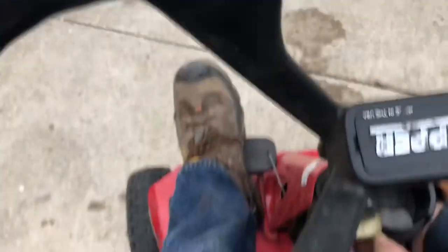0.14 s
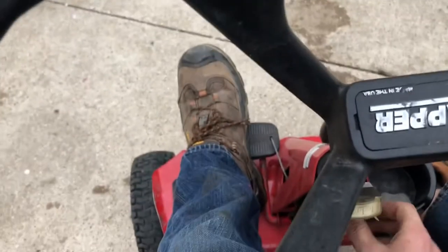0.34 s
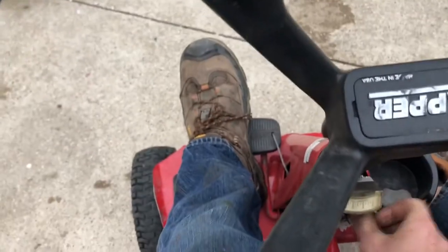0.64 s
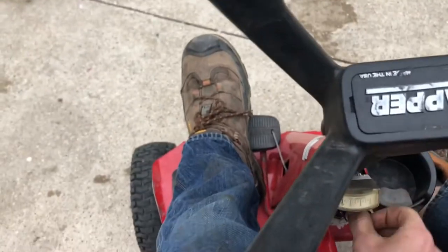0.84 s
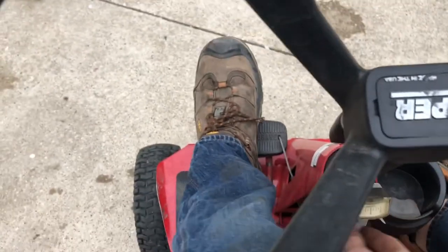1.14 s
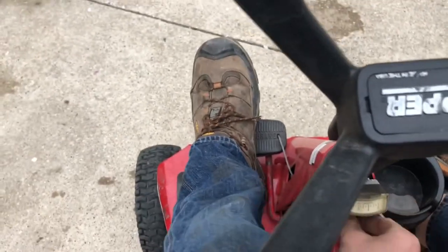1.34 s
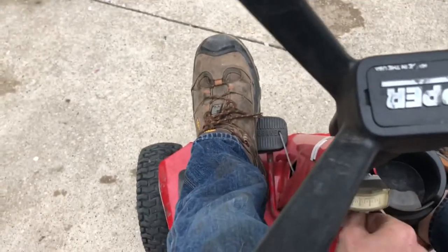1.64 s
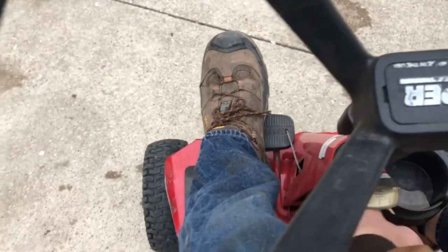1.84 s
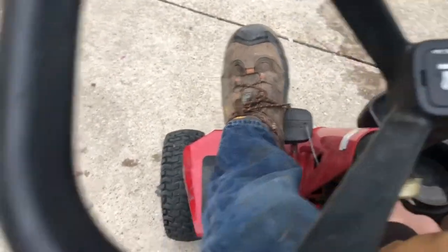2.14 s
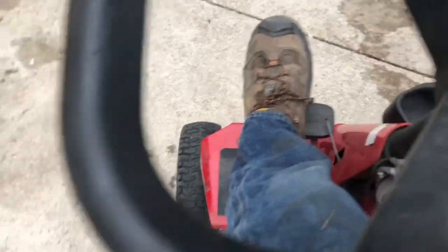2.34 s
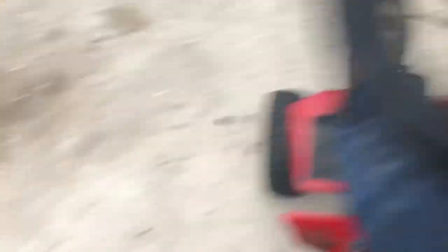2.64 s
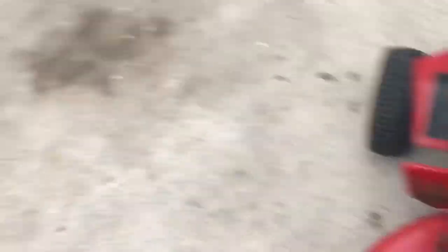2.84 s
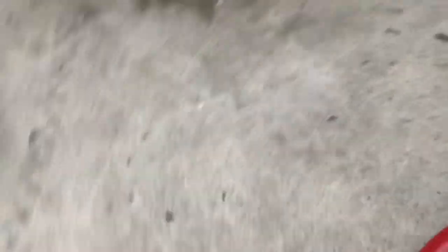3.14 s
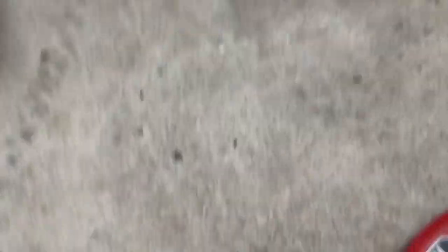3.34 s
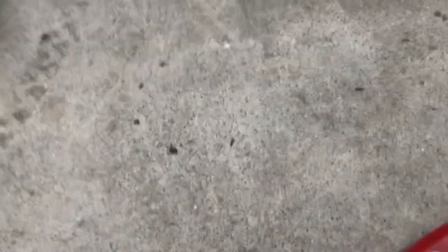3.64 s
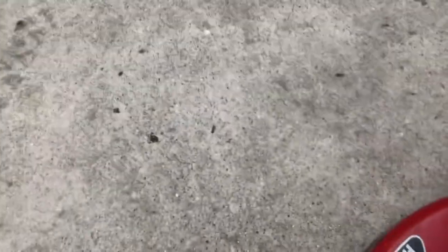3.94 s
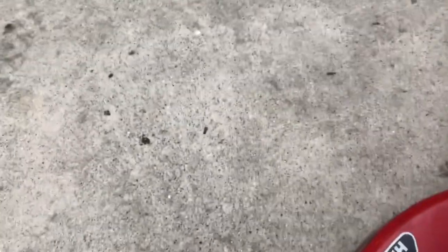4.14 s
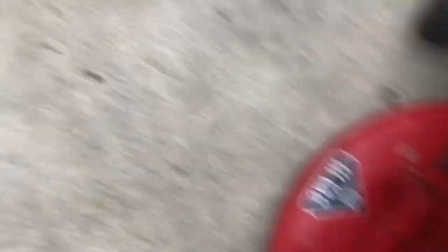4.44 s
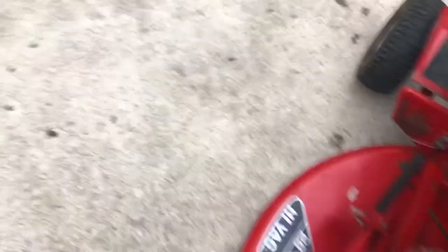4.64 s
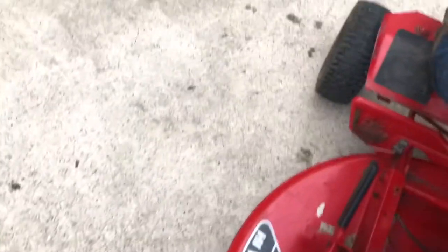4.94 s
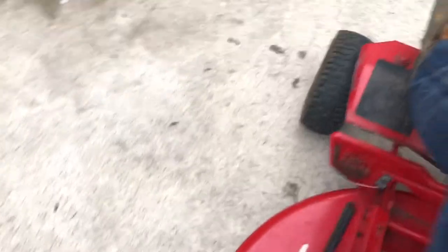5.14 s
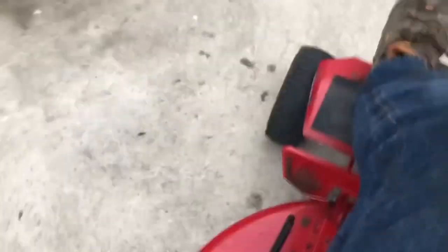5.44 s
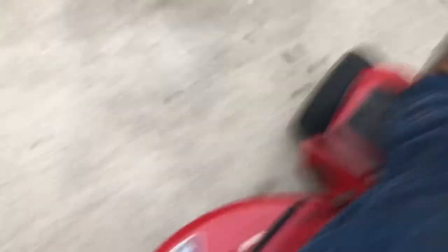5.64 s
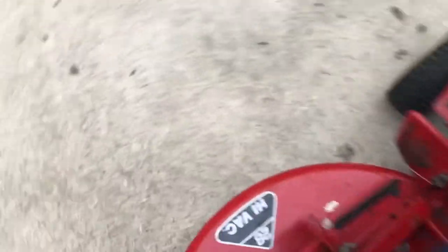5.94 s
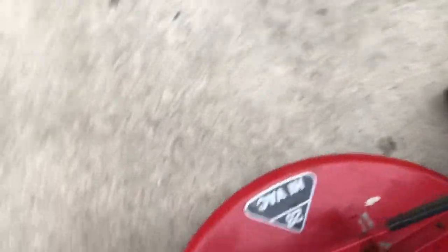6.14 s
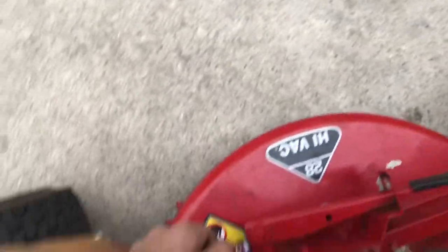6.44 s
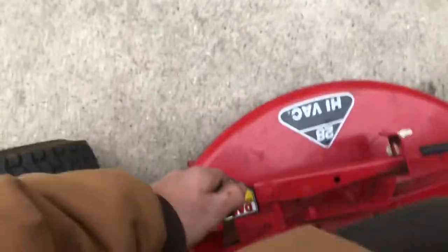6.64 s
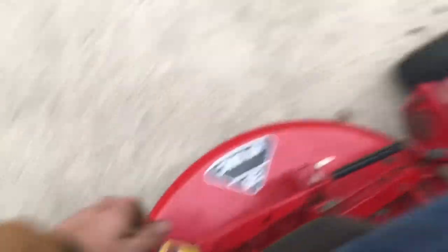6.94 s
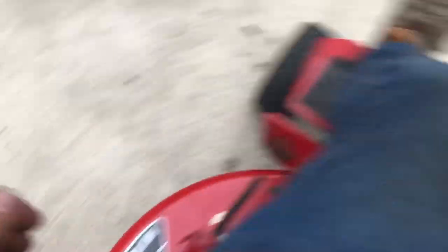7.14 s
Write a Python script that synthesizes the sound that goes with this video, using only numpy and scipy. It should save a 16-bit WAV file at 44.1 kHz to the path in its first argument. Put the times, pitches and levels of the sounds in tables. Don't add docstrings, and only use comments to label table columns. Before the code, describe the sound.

Key rattles and sharp clicks, then a small riding mower's starter grinds, the engine chugs unevenly, catches, revs up and settles into steady clattering running.

```python
import sys
import numpy as np
from scipy import signal
from scipy.fft import rfft, irfft
from scipy.io import wavfile
from scipy.ndimage import uniform_filter1d

SR = 44100
rng = np.random.default_rng(int(sys.argv[2]) if len(sys.argv) > 2 else 0)


def linear_from_db(decibels):
    return 10 ** (np.asarray(decibels, float) / 20)


def digitize_waveform(pressure):
    field = np.atleast_2d(pressure).T
    bounded = np.clip(field, -1, 1)
    quanta = np.round(bounded * 32767).astype(np.int16)
    wavfile.write(sys.argv[1], SR, quanta)


N = 322371
T = np.arange(N) / SR

# frequency in Hz, level in dB.
RUN_COLOUR = [(18, -34), (30, -24), (90, -7), (134, -11), (184, -0.5), (245, -2), (473, -4), (540, -15),
              (866, -17), (937, -20), (1760, -23.5), (2010, -25), (6210, -38), (16000, -48.5)]


def evened(x):
    return x / np.sqrt(np.mean(x ** 2) + 1e-20)


def curve(rows):
    s, *columns = np.transpose(rows)
    return [np.interp(T, s, c) for c in columns]


def add(mix, s, sound):
    part = mix[round(s * SR):][:len(sound)]
    part += sound[:len(part)]


def wander(per_s, count=1):
    points = rng.standard_normal((count, int(N / SR * per_s) + 3))
    return np.array([np.interp(T * per_s, np.arange(len(p)), p) for p in points]) * 2.57


def noise(colour, modes=(), lift_db=0., patchy_db=-1.5):
    a, b, patches = rng.standard_normal((N // 128 + 5, 257, 3)).T
    patches = uniform_filter1d(uniform_filter1d(patches, size=5, axis=0), size=24, axis=1)
    spectrum = (a + 1j * b) * linear_from_db(patchy_db * evened(patches))
    white = signal.istft(spectrum, nperseg=512, noverlap=384)[1][:N]
    hz = np.fft.rfftfreq(N, 1 / SR)
    f, db = np.transpose(colour)
    gain = linear_from_db(np.interp(np.log(hz + 1), np.log(f), db))
    gain *= 1 + sum(linear_from_db(lift_db) / (1 + (2 * (hz - m) / w) ** 2) for m, w, _ in modes)
    coloured = rfft(white) * gain
    low, high = 1 / (1 + (hz / 550) ** 4), 1 / (1 + (3000 / (hz + 1)) ** 4)
    return [evened(irfft(coloured * band, N)) for band in (low, 1 - low - high, high)]


def ring(hz, t60, rise_s):
    t = np.arange(int(t60 * SR)) / SR
    x = (1 - np.exp(-(t / rise_s) ** 2)) * linear_from_db(-60 * t / t60) * np.sin(2 * np.pi * hz * t)
    return x / abs(x).max()


def strike(turns, share, db, spread_db, sound):
    at = np.flatnonzero(np.diff(np.floor(turns + 1 - share)))
    train = np.zeros(N)
    train[at] = linear_from_db(db + spread_db * rng.standard_normal(120)[:len(at)])
    return signal.oaconvolve(train, sound)[:N]


def window(turns, centre, width):
    return np.exp(-(((turns - centre + .5) % 1 - .5) / width) ** 2)


def yard():
    # frequency in Hz, level in dB.
    yard_colour = [(15, -48), (25, -4), (123, 1.5), (141, -4), (256, -6), (531, -22), (988, -28),
                   (1070, -27), (1370, -29.5), (3250, -32.5), (16000, -49)]
    # time in s, level in dB.
    rustle = [
        (0.0, -65),
        (0.62, -68.5),
        (0.838, -66),
        (1.046, -52.5),
        (1.136, -61),
        (1.534, -68.5),
        (1.61, -51),
        (1.7, -57),
    ]
    low, mid, high = noise(yard_colour, patchy_db=0.8)
    breeze = linear_from_db(-3 * np.clip(4 * (T - 1.14), 0, 1))
    air = linear_from_db(-60) * (breeze * low + 0.082 * high)
    return air + linear_from_db(curve(rustle)[0]) * (mid + 0.5 * high) * (T < 1.8)


def clicks():
    # start in s, peak in dB, ring in Hz, t60 in s.
    click_events = [(0.171, -38, 4000, 0.049), (0.183, -30, 4050, 0.043), (0.194, -35, 3950, 0.062),
                    (0.205, -29, 3440, 0.18), (0.207, -51, 3250, 0.091), (0.257, -37, 2790, 0.094),
                    (0.285, -46, 3120, 0.045), (0.299, -46, 4650, 0.045), (0.454, -44, 3250, 0.049),
                    (0.464, -45, 3320, 0.049), (0.476, -28, 3900, 0.059), (0.57, -49, 8000, 0.015),
                    (0.585, -28, 2930, 0.034), (0.59, -32, 2810, 0.031), (0.603, -30.5, 3180, 0.028),
                    (0.946, -47, 1460, 0.045), (1.002, -5, 3890, 0.048), (1.015, -19, 8500, 0.045),
                    (1.559, -10, 2540, 0.055), (1.566, -17, 1220, 0.05), (1.697, -7.5, 1250, 0.019)]
    # frequency in Hz, level in dB.
    click_colour = [(88, -43), (150, -26), (1830, -5.5), (2600, -3.5), (2920, -1.5), (4000, -3), (4410, -2),
                    (7040, 0), (16000, -13)]
    # frequency in Hz, level in dB.
    key_modes = [(2750, -20), (4000, -16), (5200, -15), (7000, -29)]
    # start in s, level in dB.
    snaps = [
        (.585, -38),
        (1.002, -29),
        (1.56, -20),
    ]
    low, mid, high = noise(click_colour)
    crack, out = 0.15 * low + .5 * mid + 0.66 * high, np.zeros(N)
    for (s, db, hz, t60), mood in zip(click_events, rng.standard_normal((len(click_events), 4))):
        t = np.arange(int(3 * t60 * SR)) / SR
        fall = linear_from_db(-110 * t / t60) + 0.26 * linear_from_db(-25 * t / t60)
        shape = (1 - np.exp(-t / 0.00059)) * fall
        add(out, s, linear_from_db(db - 14.0) * shape * crack[round(s * SR):][:len(t)])
        add(out, s, linear_from_db(db - 9.5) * ring(hz, t60 * 0.16, 0.0019))
        if s < .7:
            for (key_hz, key_db), m in zip(key_modes, mood):
                add(out, s, linear_from_db(db + key_db + 2.3 * m) * ring(key_hz * (1 + 0.041 * m), 0.027, 0.00055))
    t, fizz = np.arange(2000) / SR, evened(np.diff(high, n=2))
    for s, db in snaps:
        shape = linear_from_db(db - 60 * t / .025) * (1 - np.exp(-t / 0.0012))
        add(out, s, shape * fizz[round(s * SR):][:len(t)])
    return out


def whines():
    # start in s, end in s, first pitch in Hz, last pitch in Hz, level in dB.
    gear_tones = [(1.71, 1.81, 330, 325, -25), (1.71, 1.8, 460, 458, -30), (1.71, 1.76, 1010, 1010, -30),
                  (1.71, 1.77, 1460, 1460, -35), (1.71, 1.76, 1750, 1750, -37), (1.73, 1.82, 200, 190, -31),
                  (2.05, 2.2, 360, 300, -40), (2.21, 2.33, 1760, 1830, -42), (1.76, 1.97, 465, 460, -38),
                  (1.97, 2.05, 720, 700, -40), (1.8, 1.96, 1790, 1740, -48), (1.8, 1.96, 200, 185, -42),
                  (1.8, 1.95, 330, 290, -45), (1.77, 1.83, 1010, 1000, -41), (1.83, 1.98, 920, 880, -44),
                  (1.96, 2.07, 320, 360, -35), (1.94, 2.0, 1490, 1520, -47), (1.99, 2.03, 1500, 1500, -39),
                  (2.06, 2.11, 1500, 1510, -42), (1.99, 2.06, 860, 900, -43), (1.96, 2.03, 1030, 1060, -44),
                  (2.02, 2.06, 1280, 1270, -42), (1.98, 2.06, 1790, 1740, -43),
                  (2.06, 2.13, 1730, 1720, -44), (2.04, 2.11, 470, 450, -35), (2.11, 2.2, 450, 440, -42),
                  (2.06, 2.17, 990, 1040, -39), (2.18, 2.26, 1040, 1000, -39),
                  (2.14, 2.22, 1180, 1230, -43), (2.22, 2.33, 1450, 1560, -44), (2.19, 2.23, 310, 310, -38)]
    # start in s, end in s, first pitch in Hz, last pitch in Hz, level in dB.
    brush_bands = [
        (1.912, 2.272, 5420, 5070, -41.5),
        (2.053, 2.26, 9500, 9650, -46),
    ]
    # start in s, end in s, pitch in Hz, level in dB.
    buzzes = [(.93, 1.1, 150, -56), (1.56, 1.62, 200, -50), (.95, 1.003, 1660, -49),
              (.975, 1.003, 3500, -58), (1.02, 1.09, 1800, -56), (1.78, 2.3, 6400, -55),
              (2.08, 2.22, 8620, -55), (3.215, 3.245, 2900, -43), (6.0, 6.9, 4610, -39),
              (4.35, 5.15, 1770, -37), (5.9, 6.95, 1755, -35), (5.055, 5.09, 5750, -33),
              (5.112, 5.15, 5750, -32), (7.1, 7.31, 5780, -37), (7.24, 7.28, 10500, -41)]
    rows = [(*row, 18) for row in gear_tones]
    rows += [(*row, .1 * row[2]) for row in brush_bands]
    rows += [(s0, s1, hz, hz, db, 60) for s0, s1, hz, db in buzzes]
    out = np.zeros(N)
    for s0, s1, hz0, hz1, db, width in rows:
        n = int((s1 - s0) * SR)
        pole = np.exp(-np.pi * width / SR)
        slow = signal.lfilter([1], [1, -pole], rng.standard_normal((2, 2 * SR)))[:, -n:]
        slow = (slow[0] + 1j * slow[1]) / np.hypot(*slow) ** .5
        carrier = np.exp(2j * np.pi * np.cumsum(np.linspace(hz0, hz1, n)) / SR)
        add(out, s0, linear_from_db(db) * evened((carrier * slow).real) * signal.windows.tukey(n, .4))
    return out


def jingle():
    # frequency in Hz, level in dB.
    jingle_modes = [(4600, -5), (5730, -2), (6230, -4), (7130, -5), (7890, -8), (8780, -7), (10200, -11),
                    (11600, -12), (12500, -10)]
    # time in s, level in dB.
    jingle_hits = [(4.976, -36), (6.087, -39), (6.5, -26), (6.667, -29), (6.785, -26), (6.864, -33),
                   (6.97, -26.5), (7.047, -35), (7.213, -25.5), (7.251, -23), (7.285, -24.5)]
    per_s, level_db, spread_db, t60 = 60, -38, 3, .1
    at = np.flatnonzero((rng.random(N) < per_s / SR) & (T > 4.45))
    out, t = np.zeros(N), np.arange(6000) / SR
    force_db = spread_db * rng.standard_normal(len(at)) / 2
    for hz, db in jingle_modes:
        train = np.zeros(N)
        train[at] = linear_from_db(level_db + db + force_db + spread_db * rng.standard_normal(len(at)))
        for (s, hit_db), mood in zip(jingle_hits, rng.standard_normal(len(jingle_hits))):
            train[round(s * SR)] = linear_from_db(hit_db + db + spread_db * mood)
        out += signal.oaconvolve(train, linear_from_db(-60 * t / t60) * np.sin(2 * np.pi * hz * t))[:N]
    return out


def starter():
    # time in s, level in dB.
    spin = [
        (1.8, -49),
        (1.912, -48),
        (2.02, -48),
        (2.158, -44),
        (2.33, -36),
        (2.56, -41),
        (3.088, -46.5),
        (3.334, -46.5),
        (3.572, -40.5),
        (3.7, -30.5),
    ]
    # time in s, housing in dB, frame in dB, hiss in dB, fall in dB per s.
    crunches = [
        (1.726, -13.5, -26, -25.5, 214),
        (2.015, -28, -61, -51, 110),
        (2.266, -28.5, -50, -41, 332),
        (2.405, -22, -31, -33.5, 172),
    ]
    # frequency in Hz, level in dB.
    crank_colour = [(18, -48), (30, 13.5), (93, 9), (199, 9), (328, 0.5), (600, -10.5), (866, -16.5),
                    (1390, -25), (1760, -26.5), (2010, -40), (2170, -35.5), (6300, -50.5), (7600, -54),
                    (9500, -57.5), (16000, -68)]
    # frequency in Hz, width in Hz, a third value in dB that is
    crank_modes = [(300, 89, 0), (1010, 160, -12), (1435, 17, -16), (1870, 440, -15), (2090, 41, -19),
                   (2860, 25, -19)]
    release_s = 2.25
    hiss = linear_from_db(curve(spin)[0])
    body, frame = linear_from_db(12.5) * hiss, linear_from_db(np.where(T < release_s, 6.5, 9.5)) * hiss
    for s, body_db, frame_db, hiss_db, fall in crunches:
        rise = np.exp(-(np.minimum(T - s, 0) / 0.036) ** 2)
        crunch = rise * linear_from_db(-fall * np.maximum(T - s - 0.011, 0))
        body = body + linear_from_db(body_db) * crunch
        frame = frame + linear_from_db(frame_db) * crunch
        hiss = hiss + linear_from_db(hiss_db) * crunch
    low, mid, high = noise(crank_colour, crank_modes, lift_db=2.0, patchy_db=1.0)
    thin = signal.filtfilt(*signal.butter(4, 140, "high", fs=SR), low)
    low = np.where(T < release_s, thin, low)
    teeth = linear_from_db(0.59 * wander(150)[0])
    on = np.clip((T - 1.705) / 0.018, 0, 1) * np.clip((3.75 - T) / 0.046, 0, 1)
    return on * (frame * low + teeth * (linear_from_db(-9.5) * body * mid + hiss * high))


def escaping_gas():
    # frequency in Hz, width in Hz, a third value in dB
    head_lift = [(1800, 140, 0), (2880, 1700, 0)]
    # frequency in Hz, level in dB.
    gas_colour = [(1180, -28), (2000, 4), (2570, -7), (2980, -2), (6470, -9), (7700, -11), (16000, -17)]
    return noise(RUN_COLOUR, head_lift, lift_db=6.0)[1], noise(gas_colour)[2]


def solenoid(mid, high):
    s, db, out = 1.6945, -16.5, np.zeros(N)
    t = np.arange(int(.03 * SR)) / SR
    add(out, s, linear_from_db(db) * ring(640, .065, 0.0022))
    add(out, s, 0.17 * linear_from_db(db - 60 * t / 0.07) * (mid + high)[:len(t)])
    return out


def chugs(mid, high):
    # start in s, peak in dB, ring in Hz.
    pops = [(2.364, -10.5, 300), (2.478, -6.5, 278), (2.534, -19, 308), (2.591, -10, 280),
            (2.656, -22, 240), (2.724, -14.5, 277), (2.869, -16, 290), (3.036, -17.5, 310),
            (3.233, -20.5, 362), (3.413, -14, 347), (3.563, -12.5, 358)]
    # time in s, peak in dB.
    thumps = [(1.94, -34), (2.259, -15), (2.395, -17), (2.539, -18), (2.659, -20), (2.767, -22.5),
              (3.086, -25.5), (3.289, -13.5), (3.459, -12.5), (3.594, -13)]
    # start in s, peak in dB, relative treble in dB, t60 in s.
    puffs = [(2.372, -15.5, -6.5, 0.085), (2.4, -24, 9, 0.13), (2.429, -33, 4, 0.075),
             (2.465, -18, -14, 0.068), (2.65, -21.5, -11.5, 0.12), (2.719, -23.5, -18, 0.031),
             (2.79, -23, -7, 0.083), (2.854, -34, 0, 0.05), (2.936, -35, 2, 0.055), (2.959, -28, -8, 0.12),
             (3.02, -31.5, 0, 0.1), (3.081, -29, -21, 0.035), (3.112, -38, 5, 0.039),
             (3.139, -20, -12.5, 0.052), (3.209, -42.5, 11, 0.061), (3.283, -18.5, -1, 0.04),
             (3.309, -31, 4.5, 0.06), (3.333, -22, -11, 0.091), (3.396, -31, 3, 0.051),
             (3.454, -18, 1.5, 0.069), (3.496, -20.5, -4, 0.072), (3.548, -32.5, 6, 0.055),
             (3.565, -18.5, -10, 0.062), (3.594, -12, -3.5, 0.056), (3.623, -16, -6, 0.044),
             (3.7583, -11.5, -10, 0.079), (4.0595, -16, 0, .03)]
    # start in s, peak in dB, ring in Hz, t60 in s.
    ticks = [(2.959, -25.5, 1800, 0.026), (2.967, -31, 1750, .025), (3.031, -34, 2900, .025),
             (3.081, -23.5, 780, 0.012), (3.114, -42, 6900, .05), (3.14, -30, 1820, .025),
             (2.808, -28, 1800, .03), (3.288, -29, 4400, 0.026), (3.41, -30, 2800, .03),
             (2.379, -19, 1180, .02), (4.06, -18, 2380, .015)]
    out = np.zeros(N)
    for s, db, hz in pops:
        add(out, s, linear_from_db(db + 1.0) * ring(hz, 0.028, 0.0023))
        add(out, s - 0.022, linear_from_db(db - 12.5) * ring(hz, 0.017, 0.0035))
    t = np.arange(-650, 1500) / SR
    pulse = -np.cos(2 * np.pi * 103 * t) * np.exp(-(t / np.where(t < 0, .003, .008)) ** 2)
    for s, db in thumps:
        thump = linear_from_db(db + 1.5) * pulse
        add(out, s, thump)
        add(out, s + 0.0142, 0.43 * thump)
    for s, db, treble_db, t60 in puffs:
        t = np.arange(int(t60 * SR)) / SR
        fall = np.exp(-7 * (t / t60) ** 2) + 0.65 * np.exp(-t / 0.0014)
        puff = (mid + linear_from_db(treble_db) * high)[round(s * SR):][:len(t)]
        add(out, s, linear_from_db(db - 9) * (1 - np.exp(-t / 0.0011)) * fall * puff)
    for s, db, hz, t60 in ticks:
        add(out, s, linear_from_db(db) * ring(hz, t60, 0.00059))
    return out


def exhaust_strokes(turns, speed):
    # share of the cycle, level in dB, ring in Hz, t60 in s, lead in s.
    stroke_rows = [
        (.02, 12.5, 325, 0.028, 0),
        (0.225, 13.5, 360, 0.024, .002),
    ]
    # share of the cycle, level in dB, ring in Hz, t60 in s, lead in s.
    exhaust_pulse_rows = [
        (0.755, 12.5, 295, 0.018, .006),
        (.78, 6, 215, .035, .006),
    ]
    # share of the cycle, level in dB, ring in Hz, t60 in s, lead in s.
    boom_rows = [
        (.48, 9.5, 108, .055, -.0035),
        (.68, 6.5, 98, .045, -.0035),
    ]
    pulse_gain = np.clip((speed - 13) / (21 - 13), .35, 1)
    boom = -linear_from_db(-2.3 * np.maximum(speed - 19.7, 0))
    strokes = np.zeros(N)
    for rows, gain in ((stroke_rows, 1), (exhaust_pulse_rows, pulse_gain), (boom_rows, boom)):
        for share, db, hz, t60, lead in rows:
            strokes += gain * strike(turns + lead * speed, share, db, 1.0, ring(hz, t60, 0.4 / hz))
    return strokes / np.sqrt(uniform_filter1d(strokes ** 2, size=6000) + 1e-4)


def order_stack(turns, muffler, facing):
    # multiple of the firing rate, level in dB.
    orders = [(1, -7), (2, 1.5), (4, -3.5), (5, 6), (6, -6.5), (7, -2.5), (8, -2.5), (9, 6), (10, -35),
              (11, 2), (12, -1.5), (13, -0.5), (15, -1.5), (16, -18), (17, -6), (18, -8), (20, -12),
              (22, -9.5), (23, -8.5), (24, -19.5), (25, -10.5), (26, -4.5), (27, -8.5), (28, -11), (30, -8),
              (31, -10), (32, -2), (34, -10.5), (35, -11), (36, -13), (37, -11), (40, -13), (42, -18.5),
              (44, -17.5), (48, -15), (50, -20.5), (54, -20), (56, -17.5)]
    run, stack = turns > 0, np.zeros(N)
    sway, phase = wander(5, count=len(orders))[:, run], turns[run] - .74
    facing, muffler = facing[run], muffler[run]
    shroud_db = 7 * np.maximum(facing, 0) * muffler
    for i, (k, db) in enumerate(orders):
        lift_db = 11 * facing * np.exp(-((k - 14) / 1.11) ** 2)
        lift_db = lift_db + .3 * facing * np.exp(-((k - 29) / 4) ** 2)
        lift_db = lift_db + shroud_db * np.exp(-((k - 21) / 6) ** 2)
        late = .002 * k ** 2 / (1 + (k / 30) ** 2)
        level = linear_from_db(db + .016 * k * sway[i] + lift_db)
        stack[run] += level * np.cos(2 * np.pi * (k * phase - late) + .011 * k * sway[-i])
    return linear_from_db(1.4) * stack / stack[run].std()


def tappet_ticks(turns):
    # share of the cycle, level in dB.
    tappet_rows = [
        (.26, 0),
        (.76, 0),
    ]
    # frequency in Hz, level in dB, t60 in s.
    head_modes = [(610, -6, 0.025), (800, -6, 0.022), (1040, -7, .02), (1330, -3, 0.025), (1755, 6, 0.055)]
    t = np.arange(1500) / SR
    head = sum(linear_from_db(db - 60 * t / t60) * np.sin(2 * np.pi * hz * t) for hz, db, t60 in head_modes)
    return evened(sum(strike(turns, share, db, 1.0, head) for share, db in tappet_rows))


def valve_knocks(turns):
    # time in s, level in dB.
    hard_knocks = [
        (3.29, -35),
        (3.758, -16),
        (3.89, -22),
        (4.4146, -26),
        (4.789, -6.5),
    ]
    hz, t60 = 2880, .022
    knock = ring(hz, t60, 0.0008) + .3 * ring(.83 * hz, t60, 0.001) + .4 * ring(1.06 * hz, t60, 0.001)
    knocks = strike(turns, .2, -17, 2.2, knock) * np.exp(-((T - 4.6) / 0.44) ** 2)
    for s, db in hard_knocks:
        add(knocks, s, linear_from_db(db) * knock)
    return knocks


def block(turns):
    k = np.arange(38, 70)
    lines = np.zeros(2049, complex)
    lines[k] = (1.3 - .6 * (k % 2)) / np.sqrt(k) * np.exp(2j * np.pi * rng.random(len(k)))
    return np.interp(turns % 1, np.arange(4096) / 4096, evened(irfft(lines)))


def blowdown_jet(turns, speed):
    jet = uniform_filter1d(np.exp(-((turns - .42) % 1 / .27) ** 2), size=160)
    force = np.clip(speed / 21.5, .8, 1.2)
    burn = linear_from_db(.4 * rng.standard_normal(120))[turns.astype(int)]
    return jet * force * burn * linear_from_db(.8 * wander(120)[0])


def engine():
    # time in s, firings per s; turns count from the first steady pop.
    speed_rows = [(3.658, 10.5), (3.78, 14.05), (4.04, 20.9), (4.14, 22.95), (4.27, 25.05), (4.37, 26.45),
                  (4.5, 26.7), (4.64, 27.0), (5.07, 27.4), (5.5, 27.6), (5.74, 26.8), (6.01, 27.3),
                  (6.3, 27.3), (6.37, 27.5), (6.89, 27.45), (7.32, 27.6)]
    # time in s, opening from 0 to 1.
    throttle_rows = [
        (3.6, 1),
        (4.0, .97),
        (4.2, .85),
        (4.42, .65),
        (4.52, .04),
        (7.32, .04),
    ]
    # time in s, towards the muffler 0 to 1, towards the head -1 to 1.
    swing = [(4.15, 0, 0.062), (4.3, 0.12, 0.85), (4.6, 0, 1), (4.95, 0.01, 0.63), (5.15, 0.02, -0.33),
             (5.35, 0.32, -0.012), (5.55, 0.42, -0.23), (5.75, 0.5, -0.4), (5.95, 0.35, 0.35),
             (6.1, 0.14, 0.9), (6.5, 0.48, 1), (6.85, 0.62, 0.77), (7.0, 0.57, -0.37), (7.15, 0.4, -0.48),
             (7.31, 0.05, -0.74)]
    # dB at speed, full from firings per s, dB per missing firing, muffler dB, head dB.
    layers = [
        (-13.5, 17.5, -1.4, 3.5, -0.03),
        (-16.5, 16.9, -1.93, -2.5, 2.3),
        (-26, 18.4, -1, -5.5, 1.17),
        (-35.5, 36.3, -0.96, 4, 7.5),
    ]
    open_throttle_db = (3.1, 0.36, 5.4, 0.3)
    # frequency in Hz, width in Hz, a third value in dB that is
    casing = [(1750, 100, 0), (2786, 45, -8), (3950, 80, -11), (4400, 77, -12), (5760, 25, -12),
              (6230, 86, -15), (7070, 160, -17), (9100, 16, -19), (10300, 270, -20), (12000, 130, -22),
              (12400, 91, -20)]
    on = np.clip((T - 3.64) / 0.031, 0, 1)
    speed, (muffler, facing) = curve(speed_rows)[0], curve(swing)
    turns = np.cumsum(speed * (T >= speed_rows[0][0])) / SR
    throttle = np.clip(curve(throttle_rows)[0], 0, 1)
    shut = 1 - throttle
    exhaust_db, clatter_db, hiss_db, tappet_db = [
        db + lag_db * np.maximum(full - speed, 0) + muffler_db * muffler + head_db * facing + open_db * throttle
        for (db, full, lag_db, muffler_db, head_db), open_db in zip(layers, open_throttle_db)]

    low, mid, high = noise(RUN_COLOUR, casing, lift_db=-2.5, patchy_db=1.2)
    shake = 0.53 * np.clip((T - 4.0) / 0.32, 0, 1) * np.cos(4 * np.pi * (turns - .72))
    exhaust = np.sqrt(throttle) * (exhaust_strokes(turns, speed) + shake)
    exhaust = exhaust + np.sqrt(shut) * order_stack(turns, muffler, facing) + .16 * low

    mid = mid - .42 * shut * signal.filtfilt(*signal.butter(2, 1900, fs=SR), mid)
    valves = .8 + (.2 + .2 * throttle) * (window(turns, .23, .08) + window(turns, .73, .08))
    breath = 1 + .1 * np.cos(4 * np.pi * (turns - .1))
    blowdown = blowdown_jet(turns, speed)
    intake = .5 * window(turns, .06, .07) * np.clip((speed - 20.5) / 3, 0, 1)
    gasp = 1 + throttle * (1.25 * blowdown + .5 * window(turns, .2, .1) + intake - .58)
    clatter = linear_from_db(clatter_db - 1.5 + .55 * wander(90)[0]) * valves * mid
    noises = gasp * (clatter + linear_from_db(hiss_db) * breath * high)
    thin_hiss = evened(np.gradient(high[::-1]))
    noises = noises + linear_from_db(1.5 + hiss_db) * throttle * blowdown ** 2 * thin_hiss
    noises = noises + linear_from_db(-13 + clatter_db) * shut * block(turns)
    tappets = linear_from_db(tappet_db + 3.5) * tappet_ticks(turns)
    return on * (linear_from_db(exhaust_db) * exhaust + noises) + tappets + valve_knocks(turns)


def scene():
    mid, high = escaping_gas()
    near = clicks() + solenoid(mid, high) + chugs(mid, high)
    near = near + 0.21 * np.r_[np.zeros(210), near[:-210]]
    return (yard() + near + whines() + jingle() + starter() + engine())[None]


def roll_off(x):
    return signal.sosfilt(signal.butter(12, 16850, fs=SR, output="sos"), x)


def record(dry):
    bass = signal.filtfilt(*signal.butter(2, 1500, fs=SR), dry)
    limited = np.clip(np.tanh(bass * 1.07) + .85 * (dry - bass), -.95, .95)
    limited = signal.filtfilt(*signal.butter(2, 33, "high", fs=SR), limited, padtype="even")
    band_limit = signal.firwin(801, 15950, fs=SR)
    return roll_off(signal.oaconvolve(limited, band_limit[None], "same"))


dry = scene()
out = record(dry)
digitize_waveform(out)
```